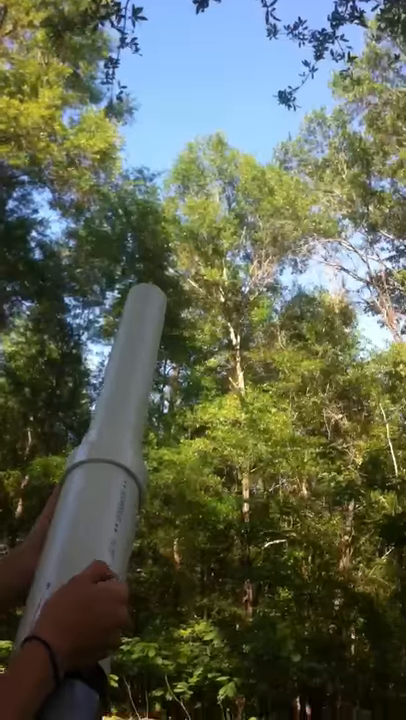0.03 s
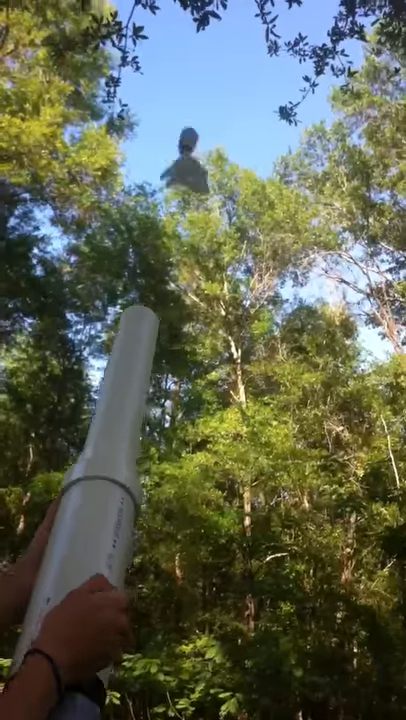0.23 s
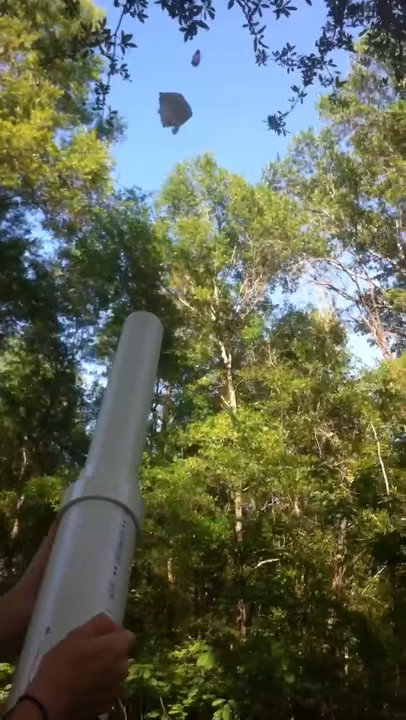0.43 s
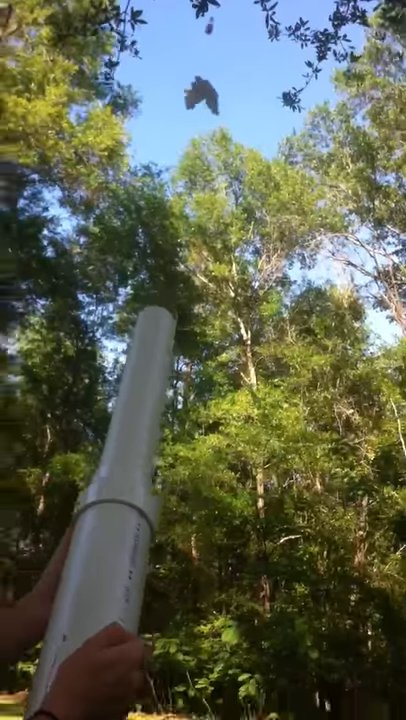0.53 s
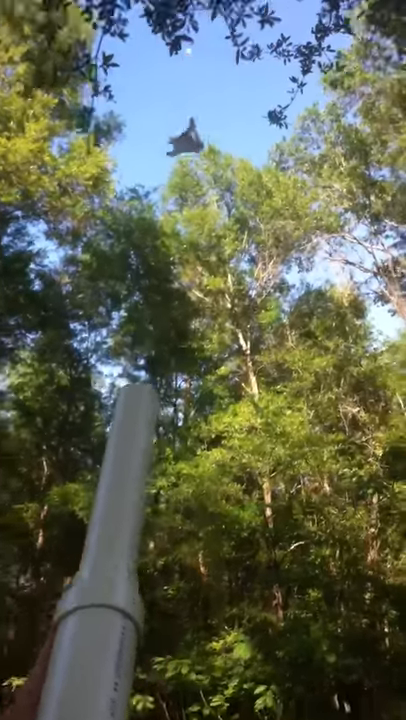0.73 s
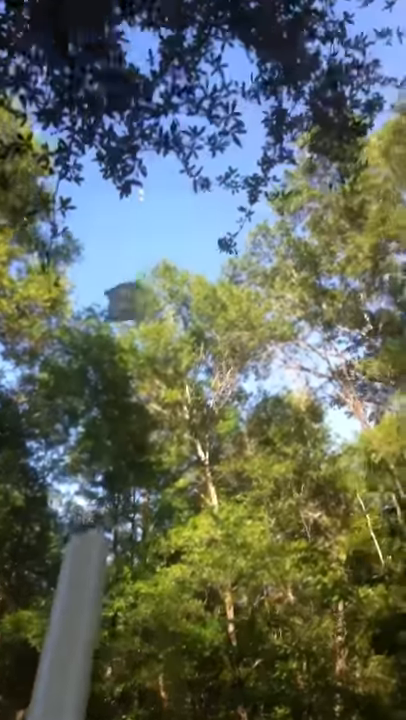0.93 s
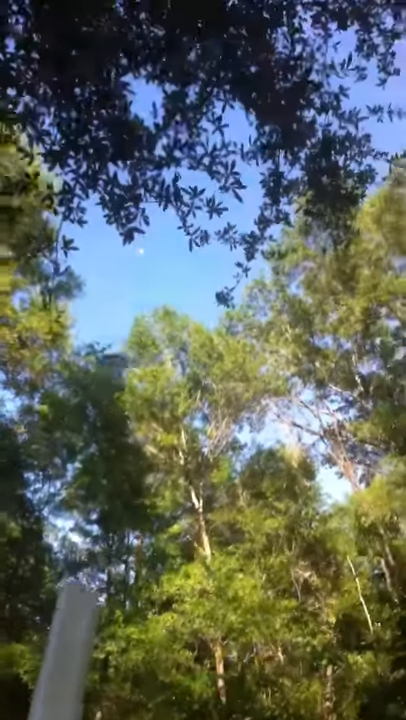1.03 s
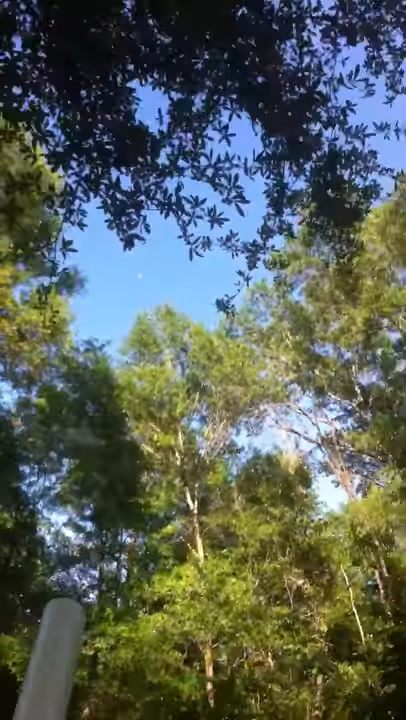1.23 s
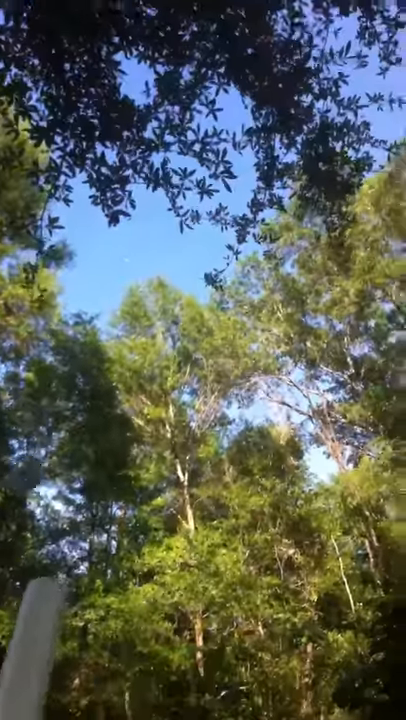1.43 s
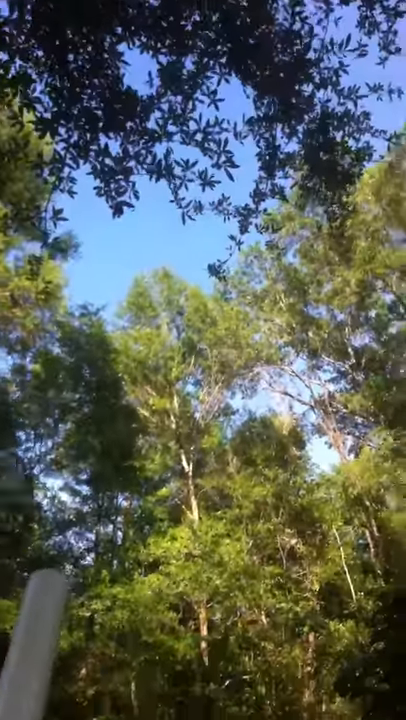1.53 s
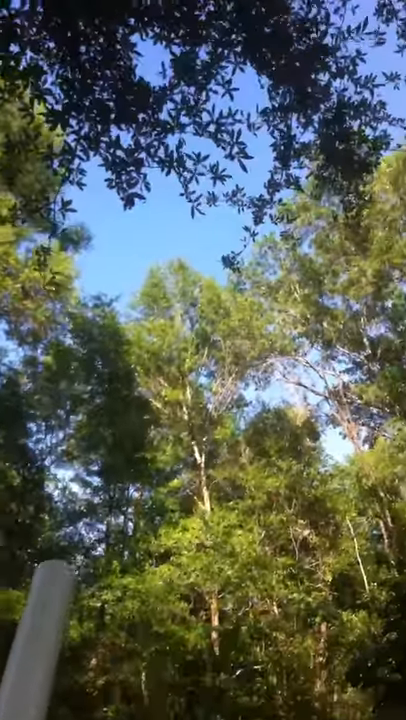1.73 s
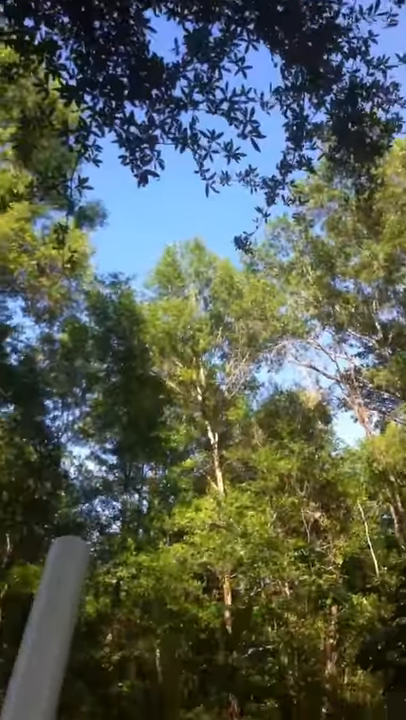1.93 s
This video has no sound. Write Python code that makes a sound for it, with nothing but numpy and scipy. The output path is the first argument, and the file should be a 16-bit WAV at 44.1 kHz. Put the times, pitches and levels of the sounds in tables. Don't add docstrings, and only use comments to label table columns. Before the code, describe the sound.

A plastic pipe cannon fires with an igniter snap, loud hollow pop and long woodland echo

```python
import sys
import numpy as np
from scipy import signal
from scipy.fft import rfft, irfft
from scipy.io import wavfile
from scipy.ndimage import uniform_filter1d

SR = 44100
rng = np.random.default_rng(int(sys.argv[2]) if len(sys.argv) > 2 else 0)


def volts_from_db(level):
    exponent = np.asarray(level, float) / 20
    return 10 ** exponent


def transcribe(signal):
    frames = np.atleast_2d(signal).T
    limited = np.clip(frames, -1, 1)
    pcm = np.round(limited * 32767).astype(np.int16)
    wavfile.write(sys.argv[1], SR, pcm)


N = 88200
T = np.arange(N) / SR
POP_S = 0.3218

# pitch in Hz, level in dB per Hz.
AIR_COLOUR = [(18, -67), (30, -27.5), (109, -7.5), (239, -6), (295, -2), (384, -12.5), (600, -7.5),
              (1720, -16.5), (16000, -31)]
# start in seconds, length in seconds, pitch in Hz, level in dB.
BIRD_NOTES = [
    (0.036, .075, 3240, -65.5),
    (.11, 0.091, 3250, -76),
]
# start in seconds, length in seconds, level in dB.
WIND_PUFFS = [
    (.0, 0.22, -68),
    (0.476, 0.14, -58),
    (.7, 0.13, -61.5),
    (1.07, .06, -64),
    (1.317, .05, -69),
    (1.504, 0.065, -59.5),
    (1.89, 0.052, -63.5),
    (1.937, .06, -67),
]
# start in seconds, peak in dB, middle pitch in Hz, time to fall 60 dB in seconds.
HAND_TICKS = [
    (0.099, -42.5, 6000, 0.0059),
    (0.509, -43, 4500, .01),
    (1.34, -45.5, 4000, 0.012),
    (1.749, -52.5, 3500, 0.01207),
    (1.815, -45.5, 4960, 0.04),
    (1.871, -51, 5970, .12),
    (1.892, -66, 6520, 0.0598),
    (1.918, -49, 6000, .07),
]
# start in seconds, pitch in Hz, length in cycles, peak in dB.
HAND_KNOCKS = [
    (1.921, 730, 7.2, -50.5),
    (1.812, 1770, 9.8, -52),
    (1.945, 329, 8, -60.5),
]
# pitch in Hz, time to fall 60 dB in seconds.
WOODS_FADE = [(100, 1.1), (300, 1.), (700, 2), (1500, 3), (3000, 1.7), (5000, 0.9149), (8000, 0.5553),
              (15000, 0.03)]
# pitch in Hz, level in dB.
WOODS_COLOUR = [(100, -25), (290, -13.5), (420, -22), (700, -10), (1200, -8.5), (2200, -11.5), (3500, -14),
                (12000, -11.5)]
# pitch in Hz, level in dB, time to fall 60 dB in seconds.
IGNITER_RINGS = [(399.8, -12.5, .05), (694, -8, 0.032), (982, -13.5, 0.021), (2580, -13, 0.012),
                 (3700, -9, .006), (5960, 2, 0.015), (8650, -1, 0.0066), (10630, -5, 0.0068),
                 (12170, 3.5, .007), (14500, -8.5, .005)]
# time in seconds, hiss level in dB.
GAS_PRESSURE = [
    (0.227, -45.5),
    (.236, -45.5),
    (0.258, -42.5),
    (0.276, -29),
    (.292, -21.5),
    (0.318, -21),
    (.326, -28.5),
    (.375, -40.5),
    (.44, -54),
]
# pitch in Hz, level in dB per Hz.
HISS_COLOUR = [(200, -29.5), (500, -12.5), (1200, -9.5), (2500, -9.5), (6000, -10), (9000, -8.5),
               (14500, -10), (16000, -12.5)]
# time in seconds, pitch in Hz, level in dB.
BURNING_NOTE = [
    (.327, 290.4, -21.5),
    (.36, 307.1, -17),
    (.39, 295.9, -19.5),
    (.435, 277.6, -16),
    (.48, 264.1, -22),
    (.515, 282.6, -20),
    (.535, 284.2, -24),
    (.565, 250.5, -28.5),
    (.59, 240.4, -35.5),
]
# time in seconds, pitch in Hz, level in dB.
COOLING_NOTE = [
    (0.6, 237.5, -34.5),
    (0.726, 216.7, -49),
    (0.828, 206.2, -57),
    (1.04, 187.6, -74),
    (1.1, 182.5, -67.5),
]
# multiple of its pitch, level in dB, change in dB per second.
GAS_OVERTONES = [(1.6, -6.5, -170), (2, -27, 19), (3, -29.5, -60)]
# pitch in Hz, width in Hz, boost in dB.
WALL_TONES = [(627.5, 11, 17), (829, 32, 18), (919.3, 14, 20)]
# start in seconds, pitch in Hz, length in cycles, peak in dB.
POP_BURSTS = [(0.295, 1950, 8.6, -20.5), (.301, 1517, 9.9, -15.5), (.3085, 700, 3.4, -24.5),
              (0.3155, 419, 1.78, -2.5), (0.3191, 655, 1.9, -6.5), (.3205, 2038, 5.3, -4),
              (0.3218, 3702, 5.4, -9), (.3216, 1107, 3, -10.5), (0.3217, 2997, 4, -14),
              (0.3222, 4700, 6, -13.5), (.3275, 2100, 7, -19), (.329, 1003, 5, -18),
              (.331, 359.2, 1.8, -14), (0.34, 2143, 8.3, -27.5), (0.356, 2300, 5.8, -29.5)]
# start in seconds, pitch in Hz, length in cycles, peak in dB.
WALL_SWELLS = [
    (.343, 624, 32, -20.5),
    (.39, 636, 87, -36),
    (.345, 930, 100, -31),
    (.335, 815, 38, -26.5),
    (.335, 970, 24, -28),
]
# pitch in Hz, level in dB, time to fall 60 dB in seconds.
PIPE_RINGS = [(398, -3.5, 0.14), (461, -3, 0.2), (620, -5.5, 0.12), (765, -7.5, 0.1), (1081, -4.5, 0.076),
              (1416, -20, 0.18), (1910, -15.5, .09), (2300, -16, 0.074)]
# pitch in Hz, level in dB.
BLAST_COLOUR = [(150, -20), (500, -5.5), (1500, -5.5), (4000, -9.5), (16000, -19)]


def evened(x):
    return x / np.sqrt(np.mean(x ** 2) + 1e-20)


def read(points, hz):
    point_hz, value = np.transpose(points)
    return np.interp(np.log(hz + 1), np.log(point_hz + 1), value)


def white():
    return rng.standard_normal(N)


def coloured(points):
    gain = volts_from_db(read(points, np.fft.rfftfreq(N, 1 / SR)))
    return evened(irfft(rfft(white()) * gain, N))


def resonate(x, hz, width):
    turn = np.exp(2j * np.pi * hz * T)
    r = np.exp(-np.pi * width / SR)
    return 2 * (turn * signal.lfilter([1 - r], [1, -r], x / turn)).real


def resonant_noise(hz, width):
    return evened(resonate(resonate(white(), hz, width), hz, width))


def dying(s, t60):
    return (T >= s) * volts_from_db(-60 * np.maximum(T - s, 0) / t60)


def rings(s, modes):
    return sum(volts_from_db(db) * dying(s, t60) * np.sin(2 * np.pi * hz * (T - s)) for hz, db, t60 in modes)


def bump(s, length):
    return np.sin(np.pi * np.clip((T - s) / length, 0, 1))


def burst(s, hz, cycles, db):
    return volts_from_db(db) * bump(s, cycles / hz) * np.sin(2 * np.pi * hz * (T - s))


def high(x, hz):
    return signal.sosfilt(signal.butter(2, hz, "high", fs=SR, output="sos"), x)


def still_air():
    drift = volts_from_db(2.3 * evened(uniform_filter1d(white(), 2500)))
    return volts_from_db(-66.5) * drift * coloured(AIR_COLOUR)


def insects():
    hush_db, hush_s = -14, 1.0
    hush = (T > POP_S) * np.clip(1 - (T - POP_S) / hush_s, 0, 1) ** 0.5
    return volts_from_db(-79 + hush_db * hush) * resonant_noise(7980, 1000)


def bird():
    return sum(volts_from_db(db) * np.sqrt(abs(bump(s, length))) * np.sin(2 * np.pi * hz * T)
               for s, length, hz, db in BIRD_NOTES)


def wind():
    puffs = sum(volts_from_db(db) * bump(s, length) for s, length, db in WIND_PUFFS)
    return resonant_noise(139.5, 62) * puffs


def handling():
    noise = white() * volts_from_db(2.3 * rng.standard_normal(N))
    span = 2.48
    ticks = 0
    for s, db, hz, t60 in HAND_TICKS:
        edges = [hz / span, min(hz * span, SR / 2.1)]
        band = signal.butter(2, edges, "band", fs=SR, output="sos")
        ticks = ticks + volts_from_db(db) * dying(s, t60) * signal.sosfilt(band, noise)
    dry_snap = burst(1.339, 4000, 1, -42)
    rustle = volts_from_db(-63.5) * (T > 1.806) * high(noise, 2000)
    return ticks + dry_snap + rustle + sum(burst(*row) for row in HAND_KNOCKS)


def woods(x):
    delay_s, rise_s = 0.032, 0.067
    returns = white() * np.clip((T - delay_s) / rise_s, 0, 1)
    hz, t, z = signal.stft(returns, SR, nperseg=512)
    fade_db = -60 * t / read(WOODS_FADE, hz)[:, None]
    z = z * volts_from_db(read(WOODS_COLOUR, hz)[:, None] + fade_db)
    echo = signal.istft(z, SR, nperseg=512)[1]
    return signal.fftconvolve(x, echo)[:N] / np.sqrt(SR / 10)


def spark():
    snap_s, travel_s = 0.2228, 0.005
    scrape = volts_from_db(-43.5) * (T > snap_s - travel_s) * (T < snap_s)
    snap = volts_from_db(-8) * dying(snap_s, 0.013)
    ringing = high(high(rings(snap_s, IGNITER_RINGS), 260), 260)
    return volts_from_db(-13.5) * ringing + high(white(), 2100) * (scrape + snap)


def hiss():
    s, db = np.transpose(GAS_PRESSURE)
    sputter = volts_from_db(1.2 * evened(uniform_filter1d(white(), 40)))
    level_db = np.interp(T, s, db) - 71 * np.maximum(T - s[-1], 0)
    return coloured(HISS_COLOUR) * sputter * volts_from_db(level_db) * (T > s[0])


def singing_gas():
    s, hz, db = np.transpose(list(BURNING_NOTE) + list(COOLING_NOTE))
    phase = 2 * np.pi * np.cumsum(uniform_filter1d(np.interp(T, s, hz), 600)) / SR
    level_db = uniform_filter1d(np.interp(T, s, db), 400) - 100 * np.maximum(T - s[-1], 0)
    onset = np.clip((T - s[0] + 0.002) / 0.0045, 0, 1)
    level = np.sqrt(2) * volts_from_db(level_db) * onset
    since = np.maximum(T - s[0], 0)
    overtones = level * sum(volts_from_db(over_db + change * since) * np.sin(multiple * phase)
                            for multiple, over_db, change in GAS_OVERTONES)
    walls = sum(volts_from_db(boost) * resonate(overtones, wall_hz, width) for wall_hz, width, boost in WALL_TONES)
    return level * np.sin(phase) + overtones + walls


def blast():
    return volts_from_db(-13) * dying(POP_S, 0.027) * coloured(BLAST_COLOUR)


def pop():
    thump_s = 0.316
    bursts = sum(burst(*row) for row in POP_BURSTS)
    swells = sum(burst(*row) for row in WALL_SWELLS)
    crack = volts_from_db(-10) * dying(POP_S, 0.0061) * high(white(), 1500)
    thump = rings(thump_s, [(78, -29.5, 0.089)])
    rumble = volts_from_db(-29.5) * dying(thump_s, 0.4) * resonant_noise(169, 75)
    pipe = volts_from_db(-16.5) * rings(POP_S, PIPE_RINGS)
    return bursts + swells + crack + thump + rumble + pipe


def scene():
    background = still_air() + insects() + bird() + wind() + handling()
    gas = hiss()
    tones = singing_gas() + pop()
    echo = woods(gas + blast() + volts_from_db(-15) * tones)
    return (background + spark() + gas + tones + echo)[None]


def band_limit(x):
    return signal.sosfilt(signal.butter(12, 17090, fs=SR, output="sos"), x)


def record(dry):
    dropout = (T > 0.2035) & (T < 0.2175)
    mute = uniform_filter1d(np.where(dropout, volts_from_db(-56), 1.0), 40)
    heard = 0.82 * np.tanh(high(dry, 60) * mute / 0.83)
    top = signal.firwin(255, 15900, fs=SR)
    heard = signal.oaconvolve(heard, top[None], "same")
    return band_limit(heard)


dry = scene()
out = record(dry)
transcribe(out)
```